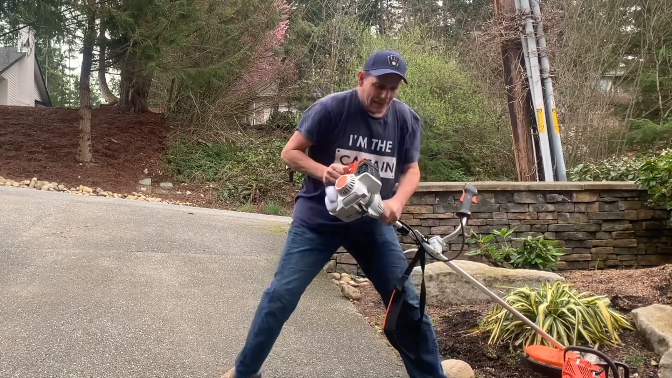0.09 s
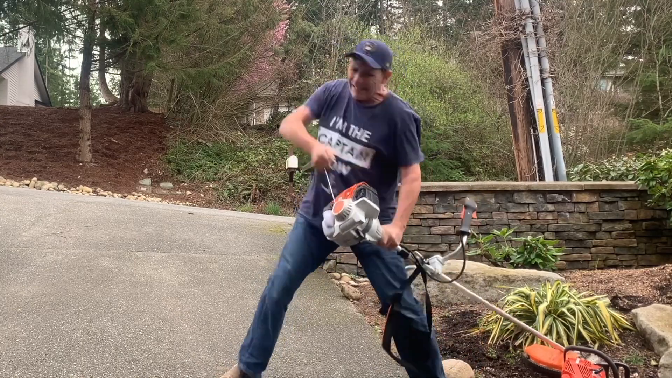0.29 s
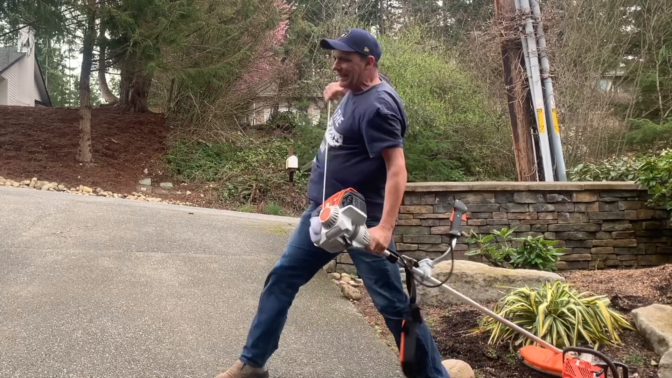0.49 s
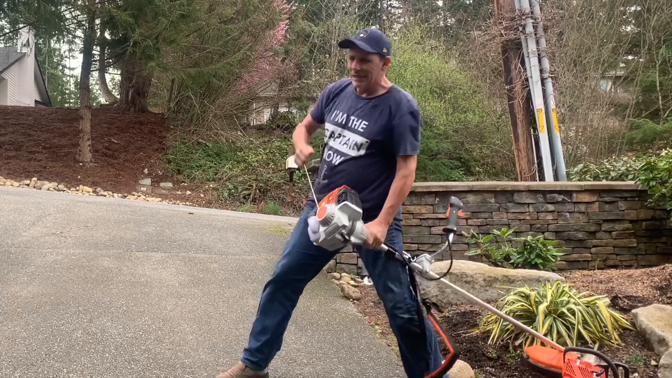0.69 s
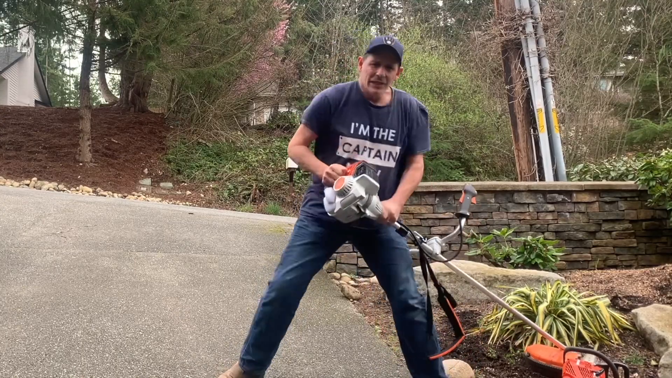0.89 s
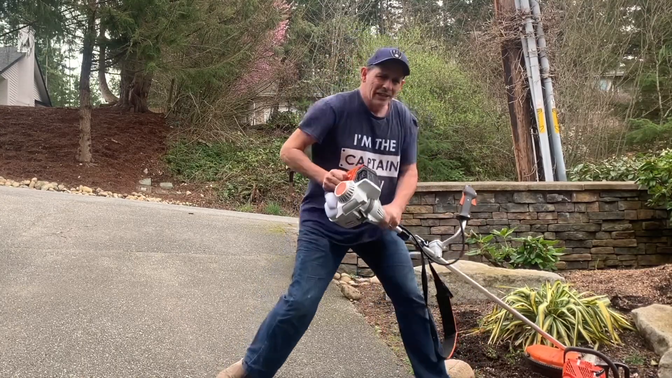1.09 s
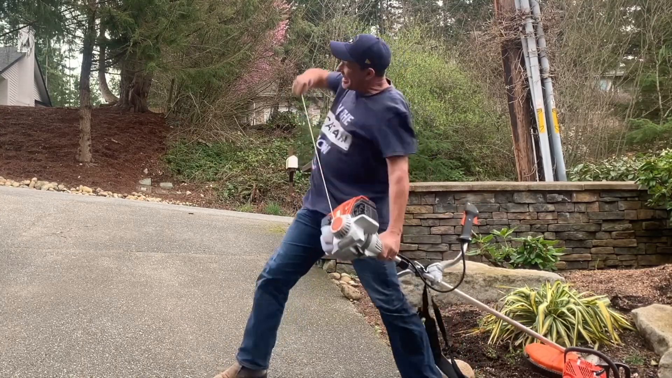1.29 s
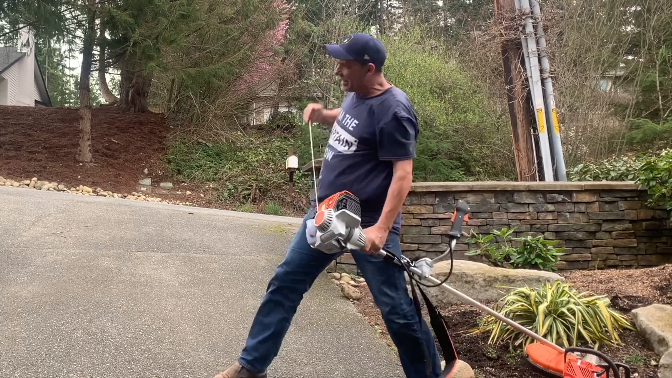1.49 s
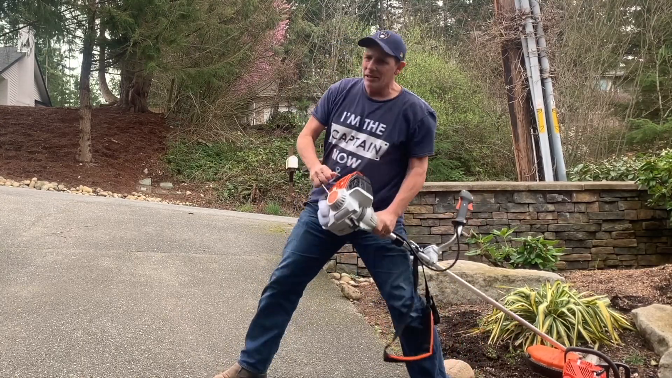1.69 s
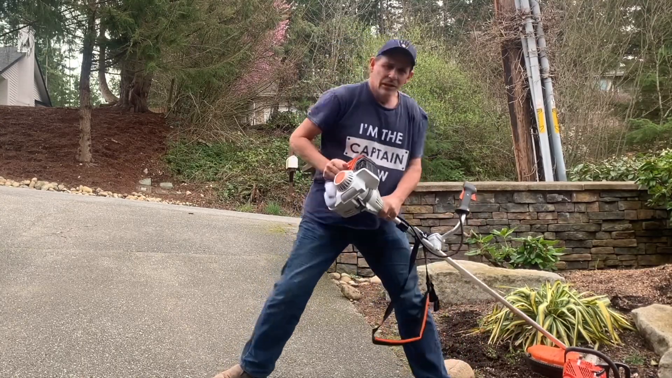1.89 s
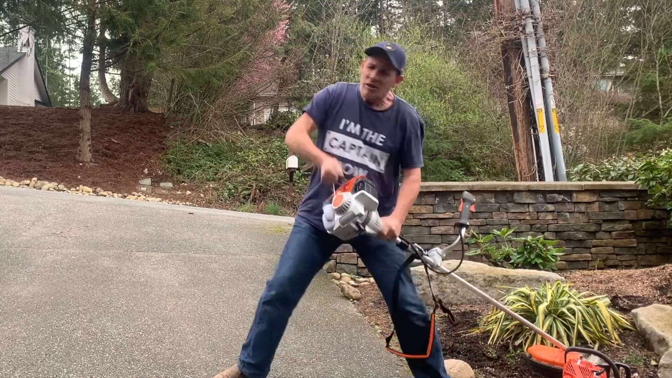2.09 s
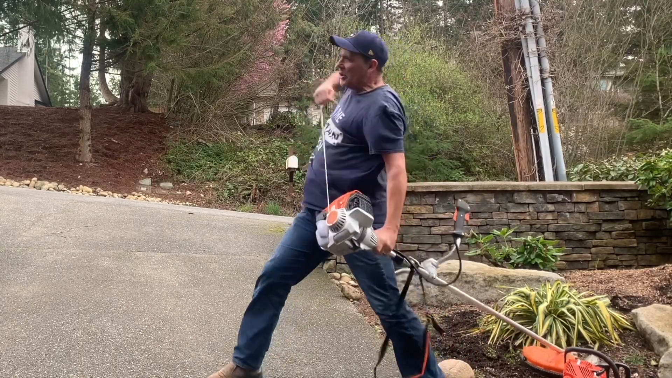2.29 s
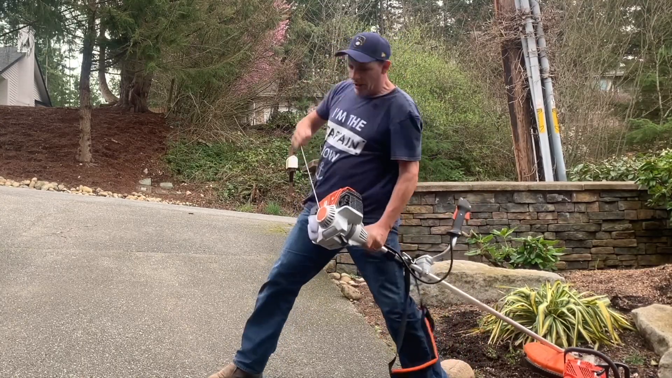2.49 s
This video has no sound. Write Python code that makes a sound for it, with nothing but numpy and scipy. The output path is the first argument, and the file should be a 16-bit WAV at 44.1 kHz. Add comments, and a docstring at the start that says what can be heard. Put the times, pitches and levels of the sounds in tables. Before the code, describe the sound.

A string trimmer's starter cord is yanked three times outdoors. Each pull brings a clack, a quick rope whirr over a chuffing engine, then a sharp chatter. The cord rewinds with light knocks; the engine never fires.

```python
"""Pull-starting a string trimmer

A recoil starter is pulled three times on a driveway; the engine turns over but never fires.
In each pull the pawls catch with a clack, the rope whirrs out while the piston chuffs, and the pawls
chatter free, leaving the starter cup ringing. A spring rewinds the rope; the handle knocks the housing."""
import sys
import numpy as np
from scipy import signal
from scipy.fft import rfft, irfft
from scipy.io import wavfile

SR = 44100
rng = np.random.default_rng(int(sys.argv[2]) if len(sys.argv) > 2 else 0)


def pcm_store(signal):
    """Save signal as 16-bit PCM."""
    levels = np.round(np.clip(np.atleast_2d(signal), -1, 1) * 32767)
    wavfile.write(sys.argv[1], SR, levels.astype(np.int16).T)


N = 112455

# Pulls: start t/s, stroke/s, levels/dB of engine, rope, chatter and cup, engine rise/s,
# engine fall/(dB/s), rewind level/dB, time from start until the rewind fades/s
PULLS = [(0.226, 0.15, -32, -31.5, -13.5, -27.5, 0.08, 84.5, -35, 0.44),
         (1.128, 0.160, -30.5, -31.5, -15.5, -39.5, 0.088, 92.5, -36.5, 0.44),
         (2.059, 0.156, -30, -33, -16.5, -27, 0.057, 112, -37, 0.45)]
# Housing modes: f/Hz, T60/s, level/dB struck by the pawls, level/dB struck by the handle
HOUSING = [(553, 0.046, -18.5, -12.5), (707, 0.099, -9.5, -15), (1008, 0.08, -11, -17),
           (1115, 0.037, -3, -7), (1245.5, 0.045, -1.5, -12), (1545, 0.028, -7, -8.5),
           (1748, 0.056, -11.5, -49.5), (1992, 0.032, -7.5, -19), (2440, 0.032, -19, -16.5)]
CRANK_HZ, REEL_HZ = 45.25, 1329.4  # turning rate at full pull; main resonance of the reel


def engine():
    """Cavity resonance: the piston pumps one puff of air per turn through crankcase and muffler."""
    cavities = [(71, 11, -14), (162, 24, -1.5), (251, 26, -5.5), (460, 50, -9), (570, 90, -7.5),
                (690, 70, -7.5)]  # air modes: f/Hz, bandwidth/Hz, level/dB
    breath_spectrum = [(25, -31), (60, -13), (120, -23.5), (200, 7.5), (340, -0.5), (560, 3.5), (850, -18),
                       (1300, -24), (2500, -9.5), (6000, -56)]  # flow noise: f/Hz, level/dB
    spin_up_s, coast_s = 0.0392, 0.3
    flow, chugs = 0, 0
    for start, stroke, db, *_, rise, fall, _, _ in PULLS:
        t = np.maximum(since(start), 0)
        coasting = np.maximum(t - stroke, 0)
        speed = CRANK_HZ * (1 - np.exp(-t / spin_up_s)) * np.exp(-coasting / coast_s)
        effort = np.minimum(t / rise, 1) * undb(db - fall * coasting)
        flow += effort * turning(speed, depth=0.56)
        turn_pulses = np.diff(np.floor(np.cumsum(speed) / SR), prepend=0)
        chugs += effort * turn_pulses * np.sqrt(SR / CRANK_HZ)
    puffs = flow * grains(900, 2.6, 0.41) + undb(-2) * chugs
    sound = undb(-1) * shaped(flow * grains(1500, 2.3, 0.6), breath_spectrum)
    for hz, width, db in cavities:
        sound += undb(db) * resonate(puffs, ring(hz, t60=np.log(1000) / np.pi / width))
    return sound


def rope():
    """Sliding friction: the braided cord rasps through its eyelet, rattling and jolting the hollow reel."""
    jerks = [(0.298, -21), (0.320, -21), (0.352, -15.5), (0.396, -17), (0.429, -21), (1.216, -20),
             (1.26, -18), (1.339, -21), (2.168, -18), (2.296, -26.5)]  # the engine jerks the reel on its post: t/s, level/dB
    rasp_spectrum = [(200, -20.5), (600, 8), (900, -5), (1270, 0.5), (2300, -5.5), (3400, -12.5),
                     (4150, -4.5), (4800, -14.5), (6300, -9), (10500, -12.5), (15500, -20.5)]  # cord in the eyelet: f/Hz, level/dB
    growth_db, fall_s, take_up_s, tick_s = 6.5, 0.025, 0.0056, 0.0018
    drive, jolts = 0, np.zeros(N)
    for start, stroke, _, db, *_ in PULLS:
        t = since(start)
        progress = np.clip(t / stroke, 0, 1)
        effort = undb(db + growth_db * (progress - 0.5)) * np.exp(-np.maximum(t - stroke, 0) / fall_s)
        slack = undb(-32) * np.exp(-abs(t) / take_up_s)  # runs out just before the catch
        drive += np.where(t > 0, effort, slack)
    for start, db in jerks:
        jolts[int(start * SR)] = undb(db)
    ticks = undb(-9.5) * convolve(jolts, np.exp(-since(0) / tick_s)) * rng.standard_normal(N)
    rasp = shaped(drive * grains(900, 3.5, 0.55) + ticks, rasp_spectrum)
    reel = ring(REEL_HZ, 0.018) + undb(-4.5) * (ring(594, 0.022) - ring(1045, 0.0072))
    rattle = undb(-2) * drive * turning(CRANK_HZ, depth=0.38) * grains(350, 2.8, 0.18)
    return rasp + resonate(rattle, reel) + convolve(jolts, reel)


def pawl_catches():
    """Impact excitation: the pawls catch and bounce, clicking and ringing the housing."""
    catches = [(0.2275, -7.5, -16, 1.0, 0.85), (1.1292, -9, -16, 0.97, 0.66),
               (2.0535, -37, -24.5, 0.95, 0.55), (2.0625, -9.5, -17.5, 0.98, 0.93),
               (2.0668, -22.5, -48, 0.76, 0.94)]  # t/s, housing level/dB, click level/dB, pitch ratio, share of ring time
    return blows(catches, [db for _, _, db, _ in HOUSING], full_click_s=0.0058)


def pawl_release():
    """Free vibration: as the stroke ends the pawls chatter, the reel squawks and the cup rings on."""
    cup_modes = [(1, 0, .52), (1.016, -10, .1), (.955, -21, .16)]  # starter cup: frequency ratio, level/dB, T60/s
    chatter_spectrum = [(200, -15), (550, 15), (900, -14.5), (1350, 20.5), (1900, 1.5), (4000, 1),
                        (5100, -9.5), (6200, 5), (10700, -0.5), (15300, -13.5)]  # pawls skipping over the cup: f/Hz, level/dB
    rise_s, fall_s = 0.0043, 0.0086
    cup_hz, sag_hz_per_s, drift_rad = 6135, 340, 0.03
    chatter, squawk, cup = 0, 0, 0
    for start, stroke, _, _, chatter_db, cup_db, *_ in PULLS:
        t = since(start + stroke)
        chatter += undb(chatter_db) * np.exp(np.where(t < 0, t / rise_s, -t / fall_s))
        squawk += squeak(start + stroke + 0.005193, half_s=0.0064, db=chatter_db - 1)
        age = np.maximum(t, 0)
        phase = 2 * np.pi * (cup_hz - sag_hz_per_s * age / 2) * age
        phase += (t > 0) * drift_rad * np.cumsum(rng.standard_normal(N))
        for ratio, db, t60 in cup_modes:
            cup += undb(cup_db + db) * np.sin(ratio * phase) * decay(age, t60)
    return shaped(chatter * grains(2300, 0.71, 1.0), chatter_spectrum) + squawk + cup


def handle_knocks():
    """Damped impacts: handle and rope strike the housing, whose ring the hand shortens."""
    knocks = [(0.029, -26, -75, 0.93), (0.065, -26.5, -72, 0.96), (0.102, -24, -45.5, 1.09),
              (0.496, -31, -30.5, 1.27), (0.581, -21.5, -36, 1.13), (0.747, -23.5, -53, 0.97),
              (0.755, -46, -43, 1.4), (0.8055, -17.5, -58, 0.93), (0.854, -31, -42.5, 1.04),
              (0.9305, -56.5, -54, 0.85), (0.9655, -29.5, -57, 1.26), (1.471, -17.5, -37, 1.11),
              (1.679, -18, -63, 0.95), (1.752, -13.5, -48.5, 0.96), (1.771, -28, -49, 1.08),
              (1.896, -26.5, -52, 1.016), (1.911, -51, -45, 1.1), (2.480, -23.5, -28.5, 1.15)]  # t/s, housing level/dB, click level/dB, pitch ratio
    sustain = 0.8  # share of ring time
    return blows([(*row, sustain) for row in knocks], [db for *_, db in HOUSING], full_click_s=0.0035)


def blows(events, mode_db, full_click_s, size=8192):
    """Modal superposition: each blow rings the plastic housing, with a crunch and a click at contact."""
    click_spectrum = [(300, -36), (1200, 2.5), (3000, -4.5), (4400, 3.5), (5300, -6.5), (6200, 14),
                      (7300, 2.5), (9700, 8), (12000, -1), (15500, -2)]  # hard contact: f/Hz, level/dB
    crunch_spectrum = [(150, -19.5), (600, 8), (1200, -2.5), (2200, -4), (3500, -11), (9000, -47.5)]
    body, grit, clicks = np.zeros((3, N + size))
    t = np.arange(size) / SR
    force = np.exp(-t / 45e-6)
    onset = 1 - np.exp(-t / 450e-6)
    for start, db, click_db, pitch, sustain in events:
        modes = 0
        for k, ((hz, t60, *_), level) in enumerate(zip(HOUSING, mode_db)):
            detune = 1 + 0.014 * rng.standard_normal()
            modes += (-1) ** k * undb(level) * ring(hz * pitch * detune, t60 * sustain, size)
        span = slice(int(start * SR), int(start * SR) + size)
        body[span] += undb(db) * signal.fftconvolve(modes, force / force.sum())[:size]
        grit[span] += undb(db - 12.5) * onset * np.exp(-t / (0.0064 * sustain))
        clicks[span] += undb(click_db) * onset * np.exp(-t / (full_click_s * sustain))
    crunch = shaped(grit[:N] * rng.standard_normal(N), crunch_spectrum)
    return body[:N] + crunch + shaped(clicks[:N] * rng.standard_normal(N), click_spectrum)


def rewind():
    """Modulated friction: the spring draws the rope in, hissing; the reel scrapes the housing each turn."""
    hiss_spectrum = [(120, -4.5), (400, -7), (640, 8), (870, -5), (1270, -1), (1900, -5.5), (3100, -13),
                     (4200, -10.5), (5100, -16.5), (6600, -14), (15300, -26)]  # returning rope: f/Hz, level/dB
    squeaks = [(0.467, 0.004, -26.5), (2.383, 0.0098, -34.5), (2.458, 0.0054, -33.5), (2.521, 0.0021, -31)]  # of the reel: centre t/s, half-length/s, level/dB
    turn_hz, rise_s, fall_db_per_s = 30.6, 0.017, 94
    drive = 0
    for start, stroke, *_, db, fade_at in PULLS:
        t = since(start)
        onset = np.clip((t - stroke) / rise_s, 0, 1)
        drive += onset * undb(db - fall_db_per_s * np.maximum(t - fade_at, 0))
    friction = drive * grains(2000, 3, 0.8) * turning(turn_hz / 2, depth=0.48, jitter=0.41)
    contacts = drive * grains(190, 2, 0.1) * turning(turn_hz, depth=1.6, jitter=0.3965)
    housing = sum((-1) ** k * undb(db) * ring(hz, t60) for k, (hz, t60, db, _) in enumerate(HOUSING))
    hiss = undb(-2) * shaped(friction, hiss_spectrum)
    scrape = undb(-8) * resonate(contacts, housing)
    return hiss + scrape + sum(squeak(*row) for row in squeaks)


def squeak(centre, half_s, db):
    """Stick-slip oscillation: the reel gives a short, wavering tone."""
    waver = 0.0396 * np.cumsum(rng.standard_normal(N))
    return swell(centre, half_s, db) * np.sin(2 * np.pi * REEL_HZ * since(centre) + waver)


def rustle():
    """Cloth friction: sleeve and strap rub softly as the grip shifts."""
    shifts = [(0.042, 0.082, -47), (0.787, 0.09, -49), (1.797, 0.29, -51)]  # of the grip: centre t/s, half-length/s, level/dB
    cloth_spectrum = [(180, 3), (600, -5), (1800, -5.5), (3200, -14.5), (15000, -37)]  # rubbing fabric: f/Hz, level/dB
    return shaped(sum(swell(*row) for row in shifts) * grains(1200, 3.8, 0.84), cloth_spectrum)


def faint_tone():
    """Random phase modulation: a thin, faint tone wavers and swells before the third pull."""
    waver = 0.013 * np.cumsum(rng.standard_normal(N))
    return swell(1.97, half_s=0.11, db=-57) * np.sin(2 * np.pi * 1720 * since(0) + waver)


def outdoor_air():
    """Stationary noise: a quiet background, strongest in the bass."""
    air_spectrum = [(45, -4.5), (70, 8.5), (140, -1.5), (620, -9.5), (850, -21), (1150, -12.5),
                    (1800, -15.5), (3000, -20), (6000, -31), (15000, -43)]  # ambient noise: f/Hz, level/dB
    return undb(-55.5) * shaped(rng.standard_normal(N), air_spectrum)


def yard(x):
    """Diffuse reflection: a stone wall and trees return a faint, dull tail, different in each ear."""
    t = since(0.011)  # delay of the first reflection
    tail = (t > 0) * decay(np.maximum(t, 0), t60=0.4)
    tail /= np.linalg.norm(tail)
    dull = colour(x, [(100, -5), (600, 0), (2500, 0), (6000, -11)])
    return undb(-8.5) * np.array([convolve(dull, rng.standard_normal(N) * tail) for _ in range(2)])


def widen(x):
    """Decorrelation: the two channels differ in phase and by a short scattered response, most in the treble."""
    side_spectrum = [(60, -20), (400, -12), (1300, -9.5), (2400, -4.5), (5000, -3.5), (9000, 1)]  # left-right difference: f/Hz, gain/dB
    scatter_s, scatter_share = 0.003, 0.22
    scatter = colour(rng.standard_normal(N) * np.exp(-since(0) / scatter_s), [(300, -2.5), (2500, -12)])
    scattered = np.sqrt(scatter_share) * resonate(x, scatter)
    quadrature = np.sqrt(1 - scatter_share) * signal.hilbert(x).imag
    hz, db = np.array(side_spectrum, float).T
    gain = undb(np.interp(np.arange(N // 2 + 1) * SR / N, hz, db))
    side = irfft(rfft(scattered + quadrature) * gain, N)
    return np.array([x + side, x - side])


def grains(rate, spread_db, smooth):
    """Shot noise: tiny contacts of uneven size over smooth friction noise, rms 1."""
    hits = (rng.random(N) < rate / SR) * rng.choice([-1, 1], N)
    sizes = undb(spread_db * np.clip(rng.standard_normal(N), -2, 2))
    return unit(unit(hits * sizes) + smooth * rng.standard_normal(N))


def turning(hz, depth, jitter=0.2):
    """Amplitude modulation: one swell per turn of an unsteady shaft, rms 1."""
    wobble = np.interp(np.arange(N), np.linspace(0, N, 60), rng.standard_normal(60))
    phase = 2 * np.pi * np.cumsum(hz * (1 + jitter * wobble)) / SR
    return unit(np.exp(depth * np.cos(phase)))


def ring(hz, t60, size=SR):
    """Impulse response of one damped mode."""
    t = np.arange(size) / SR
    return np.sin(2 * np.pi * hz * t) * decay(t, t60)


def decay(t, t60):
    """Exponential damping, 60 dB in t60 seconds."""
    return np.exp(-np.log(1000) * t / t60)


def swell(centre, half_s, db):
    """Gaussian envelope peaking at db."""
    return undb(db) * np.exp(-(since(centre) / half_s) ** 2 / 2)


def colour(x, points, size=4096):
    """Minimum-phase filter through points of f/Hz, gain/dB."""
    hz, db = np.array(points, float).T
    grid = np.maximum(np.arange(size // 2 + 1) * SR / size, 1)
    gain = undb(np.interp(np.log(grid), np.log(hz), db))
    cepstrum = irfft(np.log(gain))
    cepstrum[1:size // 2] *= 2  # folding onto positive time makes the filter causal
    cepstrum[size // 2 + 1:] = 0
    return convolve(x, irfft(np.exp(rfft(cepstrum))))


def shaped(x, points):
    """Spectral shaping that preserves the power of white noise."""
    return resonate(x, colour(np.ones(1), points))


def resonate(x, response):
    """Convolution with a response scaled to unit energy."""
    return convolve(x, response / np.linalg.norm(response))


def convolve(x, response):
    """Linear filtering, cut to N samples."""
    return signal.fftconvolve(x, response)[:N]


def since(start):
    """Seconds since a moment."""
    return np.arange(N) / SR - start


def undb(db):
    """Decibels to gain."""
    return 10 ** (np.asarray(db) / 20)


def unit(x):
    """Scale to rms 1."""
    return x / np.sqrt(np.mean(x ** 2) + 1e-20)


def scene():
    """Superposition: the trimmer a few metres ahead, its reflections and quiet outdoor air."""
    trimmer = pawl_catches() + handle_knocks() + engine() + rope() + pawl_release() + rewind() + rustle()
    background = outdoor_air() + faint_tone()
    return widen(trimmer + background) + yard(trimmer)


def record(dry):
    """Band limiting: the microphone thins the deep bass and dips twice in the treble; the top is cut."""
    microphone = [(24, -29), (48, -8.5), (65, -2), (7700, 0.5), (8550, -21), (9300, -0.5), (12300, 3.5),
                  (13400, -33.5), (14600, 5)]  # frequency response: f/Hz, gain/dB
    heard = np.array([colour(channel, microphone) for channel in dry])
    low_pass = signal.ellip(10, 0.2, 70, 15900, fs=SR, output="sos")
    return signal.sosfilt(low_pass, heard)


dry = scene()
out = record(dry)
pcm_store(out)
```